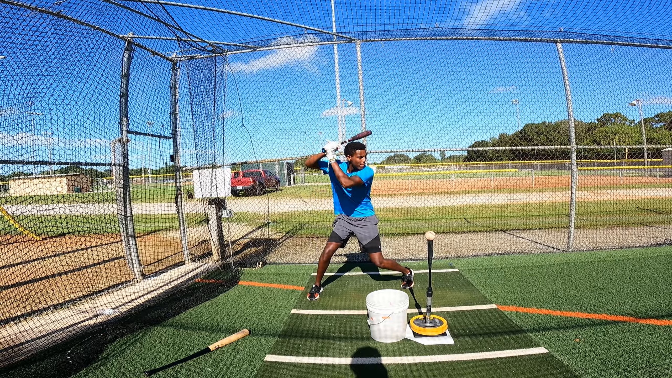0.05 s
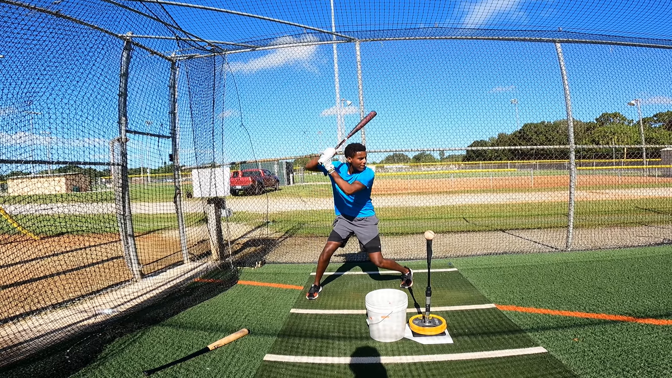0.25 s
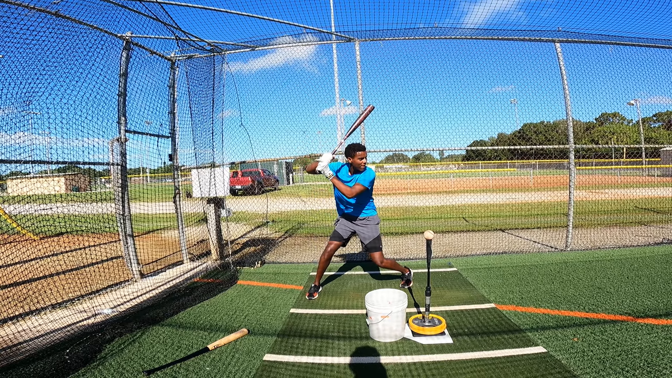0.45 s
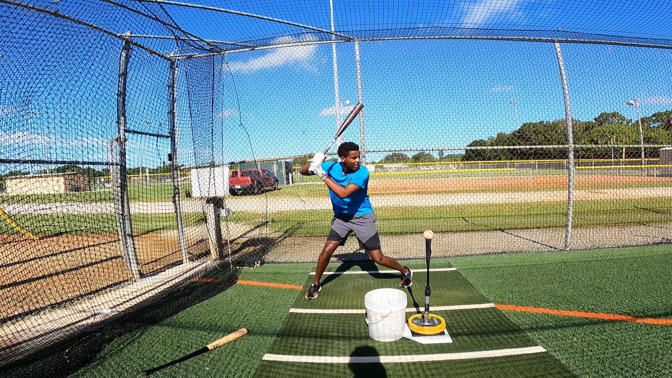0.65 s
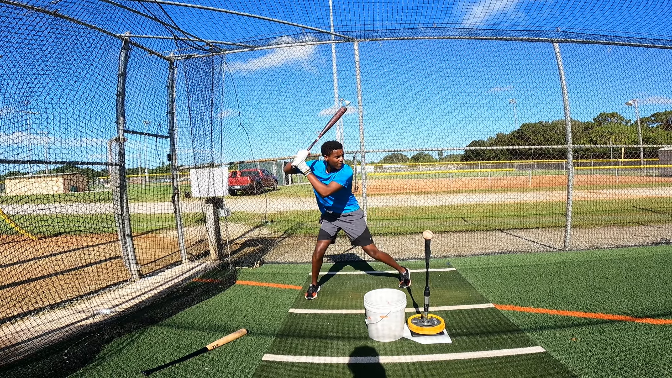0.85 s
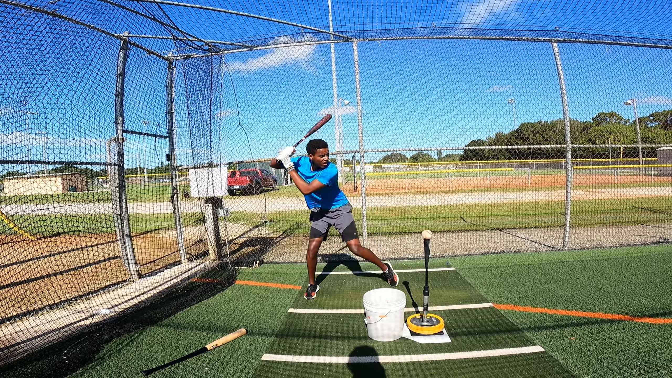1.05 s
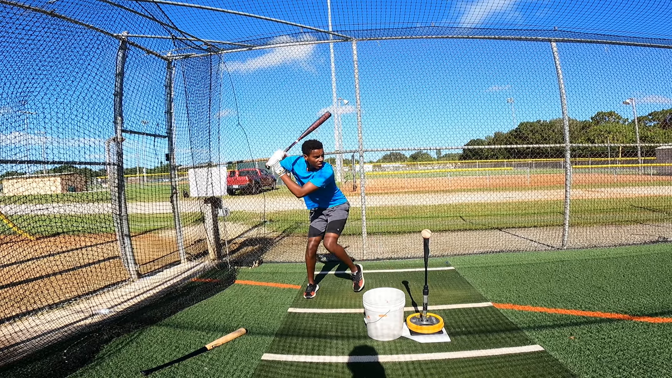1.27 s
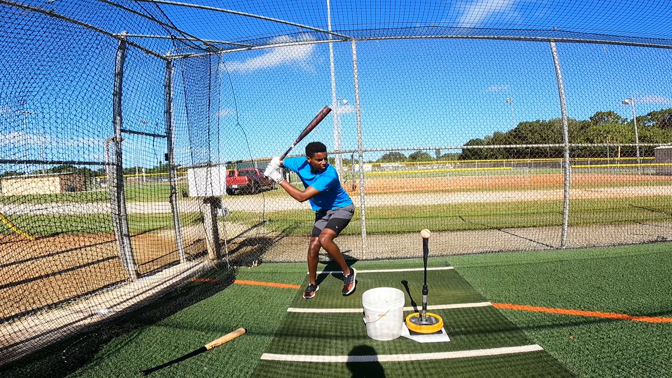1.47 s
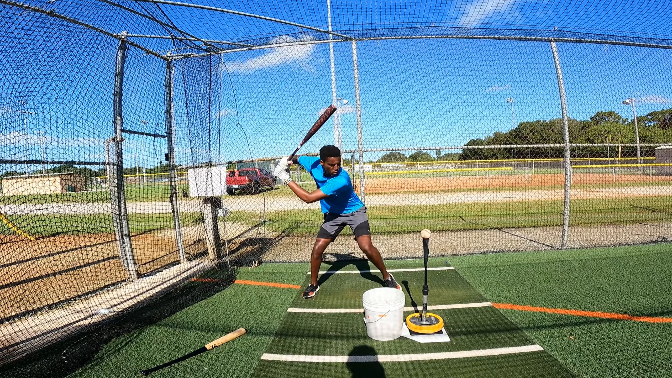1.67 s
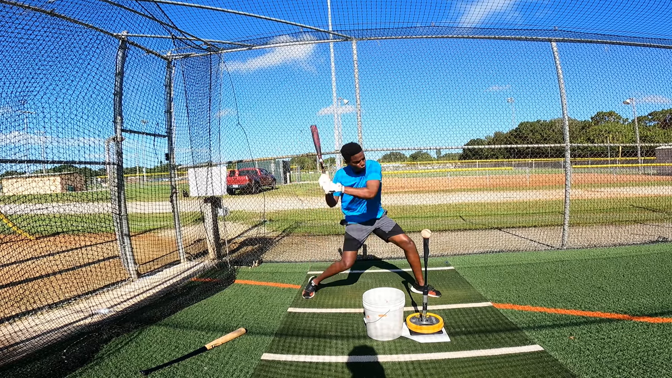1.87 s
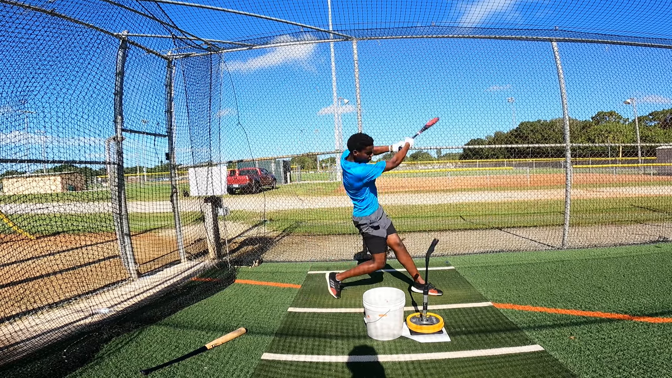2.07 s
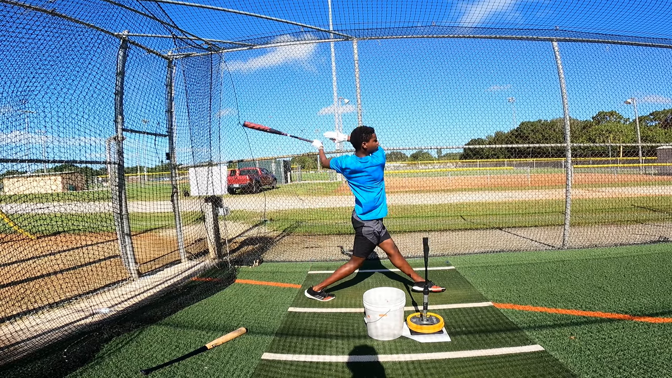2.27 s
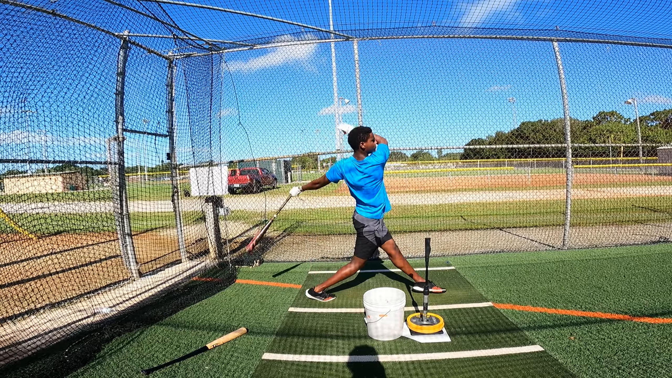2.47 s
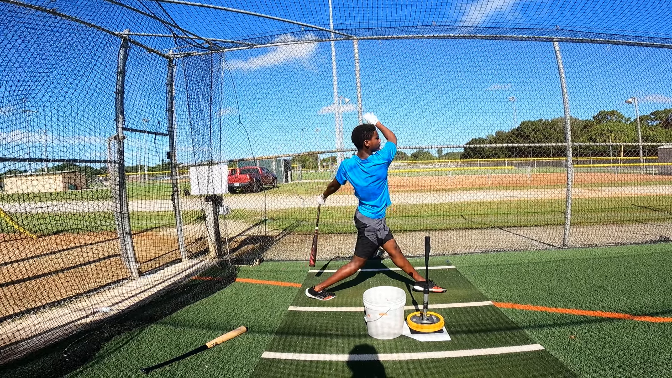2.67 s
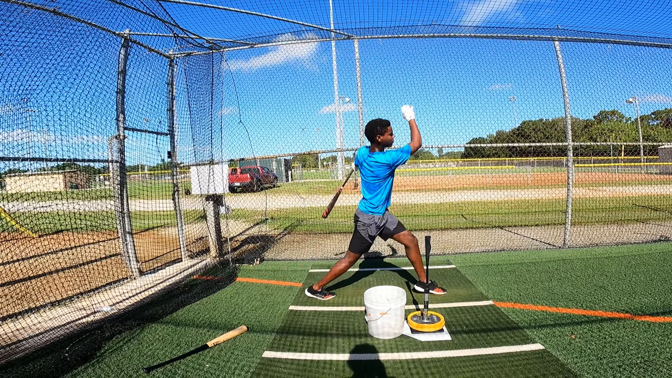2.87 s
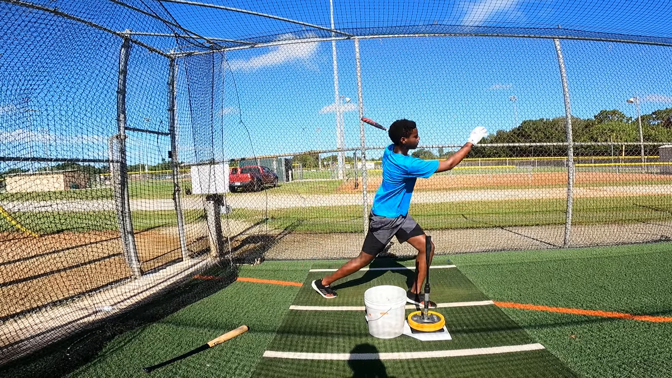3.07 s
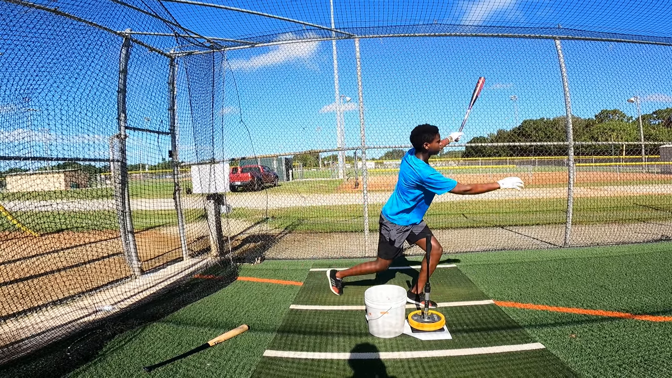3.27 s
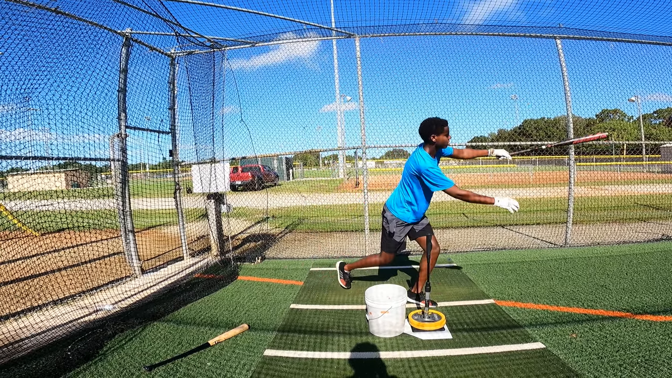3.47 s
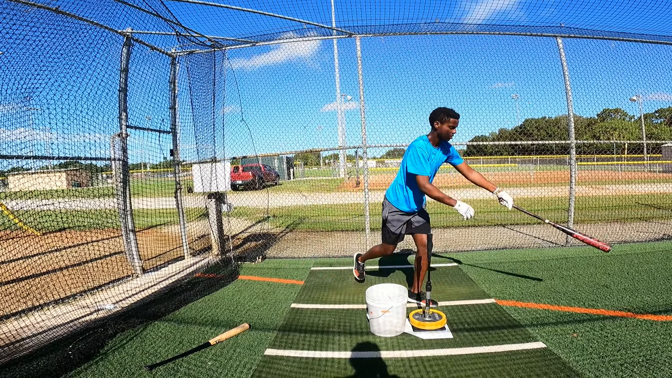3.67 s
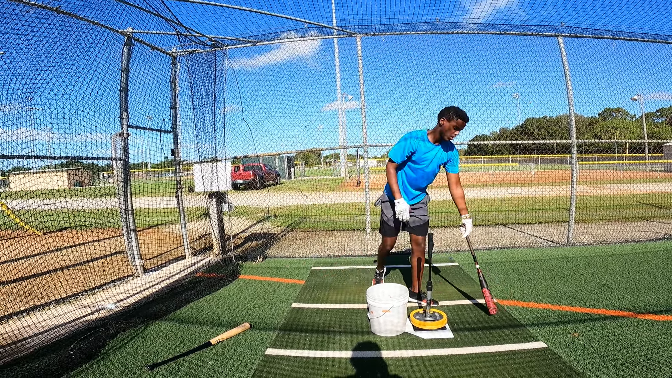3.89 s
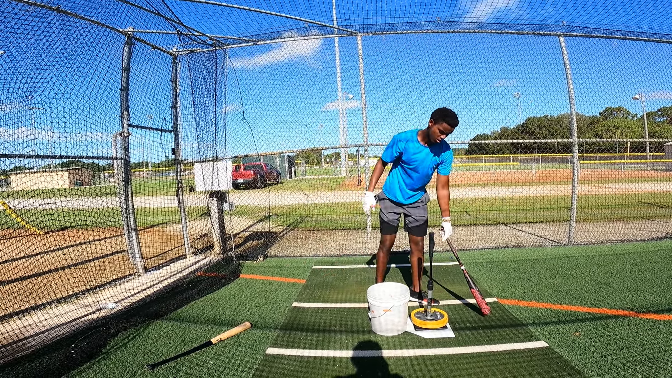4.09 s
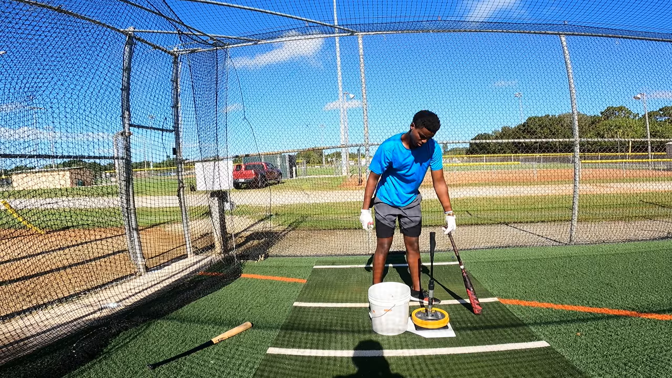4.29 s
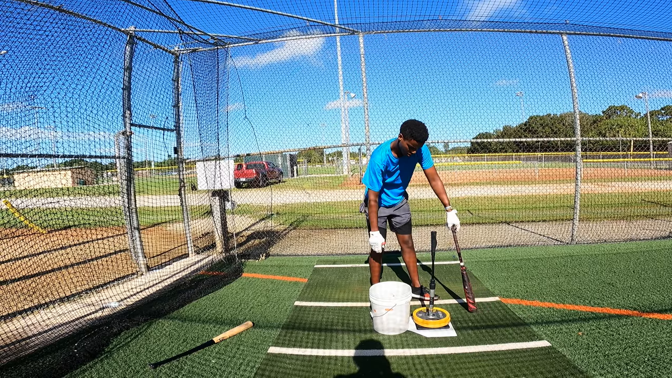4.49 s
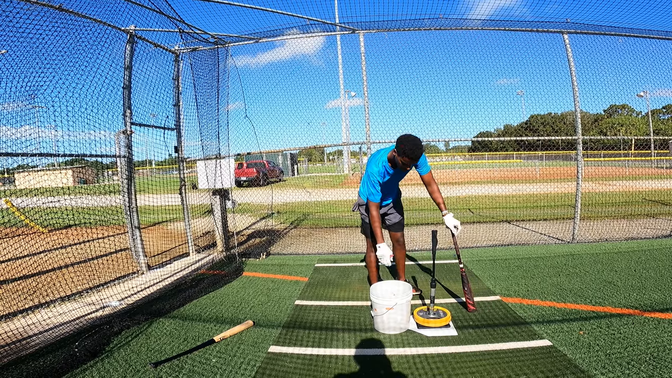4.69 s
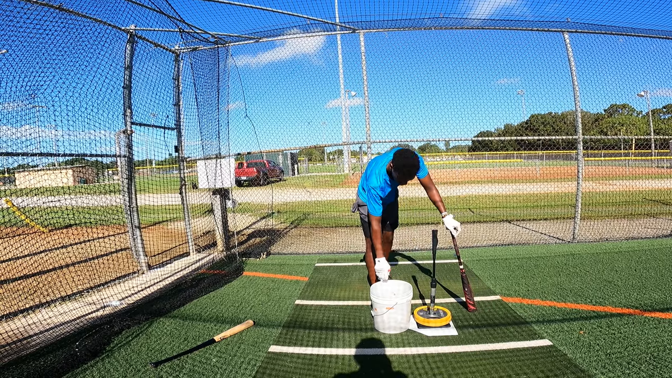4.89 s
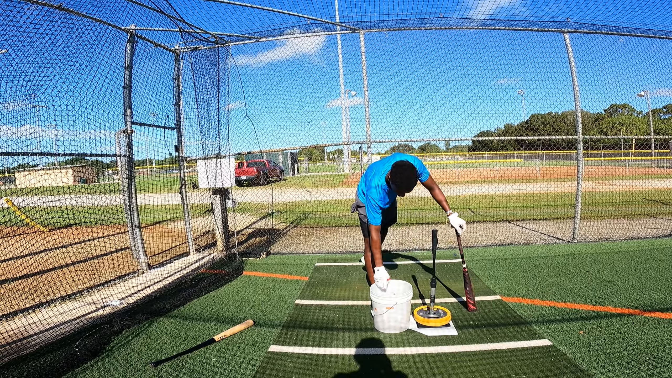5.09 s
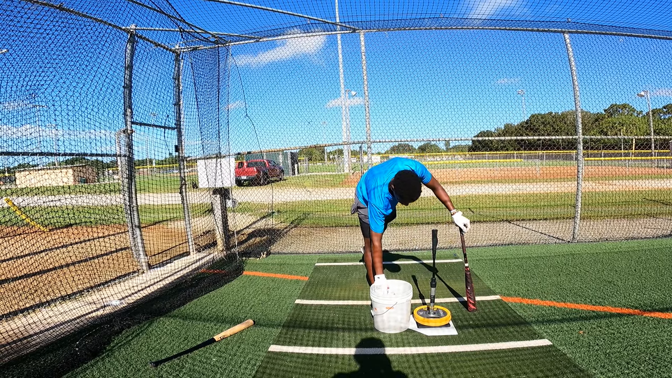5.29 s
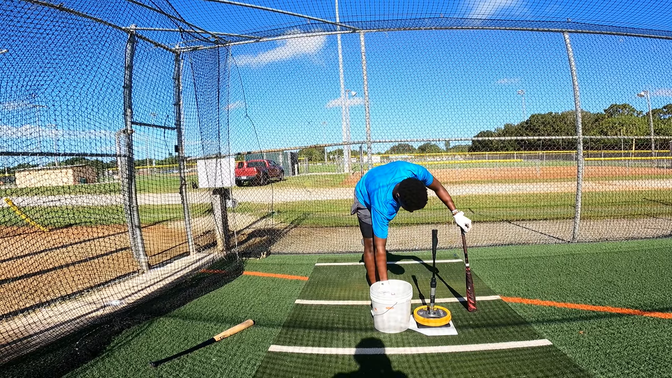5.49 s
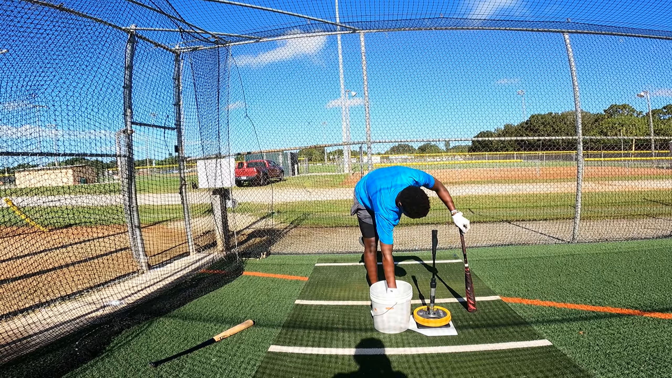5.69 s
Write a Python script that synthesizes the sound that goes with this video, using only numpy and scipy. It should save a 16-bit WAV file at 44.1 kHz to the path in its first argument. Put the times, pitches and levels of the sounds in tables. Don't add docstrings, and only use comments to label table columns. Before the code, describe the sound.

Outdoors in a batting cage, a distant mower hums low with cicadas and soft traffic rumble. Shoes scuff, then a bat hits a ball with one very loud, dry, metallic crack just after two seconds. The tee rattles, net and cage wires tick, a strap snaps, a heel knocks and the bat tip taps the mat. Stereo microphone a few metres away.

```python
import sys
import numpy as np
from scipy import signal
from scipy.fft import rfft, irfft, next_fast_len
from scipy.io import wavfile
from scipy.ndimage import uniform_filter1d, map_coordinates

SR = 44100
rng = np.random.default_rng(int(sys.argv[2]) if len(sys.argv) > 2 else 0)


def log_audio(samples):
    frames = np.atleast_2d(samples).T
    limited = np.clip(frames, -1, 1)
    pcm = np.round(limited * 32767).astype(np.int16)
    wavfile.write(sys.argv[1], SR, pcm)


def volts(x):
    e = np.asarray(x, float) / 20
    return 10 ** e


N = 253134
T = np.arange(N) / SR

SHAFT_HZ = 23.49
ECHO_SHARE = 0.52
CHORUS_OCTAVE_DB = -9
NEAR_CLEARS = 0.6
DUCK_FALL_S = 0.0158
BLOW_S = 2.11533
WALL_LAG_SAMPLES = 2
PORT_TURN = 0.09
WIRE_RISE_S = 0.00085

# freq_hz, level_db_per_hz
RUMBLE = [(12, -51), (20, -2.5), (92, -3), (125, -7), (195, -13), (330, -22.5), (430, -42), (730, -120)]
TRAFFIC = [(120, -35), (200, 12), (300, -3), (500, 0), (800, -5.5), (1200, -47)]
TYRES = [(600, -18.5), (1000, 4), (1400, 1), (2000, -5), (3000, -11), (4500, -51)]
AIR = [(2000, -12.5), (4000, 9), (6500, -3.5), (7800, 1.5), (10500, -10), (11500, -13), (14000, -11),
       (15200, -41)]
# rumble_db, traffic_db, tyres_db, air_db
FIELD_DB = (-35, -54, -59, -63)
# freq_hz, correlation
ALIKE = [(25, .8), (60, .92), (180, .92), (550, .85), (1650, .55), (5000, .75), (9500, .85), (15000, .75)]
# centre_s, swell_db, #
# length_s, engine_share (rest is tyres)
PASSES = [(1.426, 8.5, 0.26, 1), (1.912, 6.5, 0.19, 0.53), (2.75, 2, 0.34, 0.6), (3.086, 11, 0.22, 0.23),
          (3.595, 0, 0.27, 0.43), (3.88, 5, 0.57, 0.65), (4.31, -2.5, 0.068, 0.3), (1.162, 2, 0.2, 0.06),
          (4.76, 12, 0.34, 0.44), (5.194, 4, 0.1, 0.5), (5.643, 7, 0.37, 0.55)]
# start_s, depth_db, return_s
DUCKS = [
    (2.13, -9, 0.3),
    (3.04, -3.5, 0.15),
]
# time_s, level_db, upper_order_clearness_db, echo_lag_ms
MOWER = [(0, -32, -14, 2.9), (.5, -35, -10.5, 1.4), (.8, -32.5, -5.5, 1.04), (1.05, -34, -1, 0.83),
         (1.3, -36, 0, 0.34), (1.6, -39, 1, 1.18), (1.95, -31.5, -2.5, 1.2), (2.3, -37.5, -9.5, 1.3),
         (2.7, -36.5, 0, 1.3), (2.9, -34, 0, 1.56), (3.5, -35, -10.5, 2.42), (3.75, -35.5, -6.5, 2.94),
         (3.9, -36.5, -4, 3.22), (4.25, -38.5, -4, 3.54), (4.6, -33, -10, 3.87), (4.85, -33, -6, 4.18),
         (5.3, -32, -10.5, 4.53), (5.74, -34.5, -5, 4)]
# order, level_db
FIRINGS = [(4, -1), (8, -7)]
# order, level_db
SIDE_ORDERS = [(11, -15.5), (12, -25.5), (14, -19), (15, -19.5), (16, -11), (20, -37), (24, -25.5),
               (28, -21.5), (32, -34.5), (36, -35), (40, -35.5)]
# centre_s, order, gain_db, length_s
EDDIES = [(1.143, 16, 3.5, 0.11), (1.402, 24, 11.5, .17), (1.41, 28, 11, 0.11), (1.42, 32, 18, 0.15),
          (1.398, 40, 11, 0.13), (1.75, 28, 2.5, .2), (1.8, 11, 8.5, 0.25), (2.85, 36, 8.5, .25),
          (2.902, 28, 0.5, 0.22), (3.87, 32, 20, .08), (3.852, 28, 6, 0.12), (4.303, 24, 1.5, 0.28),
          (4.6, 28, 13.5, 0.24), (5.05, 28, 2, .1), (5.597, 28, 6.5, 0.16), (4.7, 36, 20, 0.13),
          (4.9, 24, 13, 0.56), (5.3, 20, 19, 0.34)]
# time_s, click_pairs_hz, level_db, far_chorus_share, second_drum_late_us
CICADA = [(0, 143, -55.5, 0.6, 52), (.1, 147.6, -57, 0.6, 63), (.16, 155, -54.5, 0.3, 59),
          (.32, 152.6, -55, 0.37, 56), (.5, 154, -56, 0.24, 73), (.75, 152.6, -54, 0.37, 71),
          (1.4, 152, -58, 0.48, 40), (2.0, 151.3, -56, 0.54, 100), (3.0, 150.3, -58, 0.63, 34),
          (3.25, 143, -63, 1, 18), (3.5, 153.2, -58.5, 0.4, 15), (3.53, 153, -57, 0.36, 120),
          (3.8, 150, -59.5, 0.6, 88), (3.97, 152.2, -58.5, 0.7, 96), (4.4, 147, -57.5, 0.64, 64),
          (4.8, 142, -56.5, 0.73, 56), (5.74, 135, -59.5, 0.73, 33)]
# freq_hz, width_hz, level_db
BELLY = [(4450, 100, 0), (4650, 240, -4), (4885, 100, 4), (5100, 200, -10), (5510, 90, 0), (5880, 150, -11)]
# start_s, freq_hz, level_db,
# t60_s, pan_db
WIRES = [(2.41, 2670, -56, 0.58, -8), (2.008, 1050, -36, .04, 1), (2.011, 2150, -40, .04, 6),
         (2.101, 950, -24, .03, -3), (2.46, 986, -35.5, 0.053, -3), (2.47, 1500, -36, 0.047, 1),
         (2.518, 5000, -39, 0.14, 4), (2.519, 4150, -44.5, 0.087, 4), (2.527, 1150, -40.5, .05, 10),
         (2.592, 5000, -46, .07, 10), (2.591, 7340, -47, 0.064, 3), (2.622, 5200, -43, 0.071, 2),
         (3.43, 5130, -53, .15, 3), (4.065, 1790, -43, 0.052, -2), (4.451, 1820, -50.5, .13, -2),
         (4.455, 6550, -61, 0.14, -2), (4.71, 3300, -60, .06, -1), (4.71, 6200, -58, .06, -3),
         (4.71, 12000, -68, .06, -1)]
# peak_s, peak_db, centre_hz, t60_s, pan_db
SCUFFS = [(1.081, -49, 1510, 0.11, 4), (1.96, -39.5, 2480, 0.24, -1), (2.006, -29, 1550, 0.16, 1),
          (2.069, -36, 2200, 0.34, 1), (2.104, -31, 1800, 0.021, -16), (2.343, -40, 4000, 0.043, -1),
          (2.531, -36, 2200, 0.36, 9), (3.09, -57, 2200, 0.022, -1), (3.104, -58, 2200, 0.027, -1),
          (4.441, -42, 2200, 0.16, 1), (4.445, -53, 6000, .1, -2), (4.679, -48, 2980, 0.048, 1),
          (4.71, -52, 5000, 0.033, 2)]
# peak_s, peak_db, centre_hz, t60_s, pan_db
RUSTLES = [(0.861, -54.5, 1360, 0.36, 19), (1.62, -42.5, 2600, 0.058, 2), (1.94, -40.5, 7500, 0.07, -2),
           (2.019, -31, 5900, 0.11, -.6), (2.051, -42, 4500, 0.08, 2), (2.54, -39, 4770, 0.14, -2),
           (2.301, -43.5, 4500, 0.32, -5), (2.59, -50, 5970, 0.058, 1), (2.625, -42, 5450, 0.11, 3),
           (2.668, -40, 3200, 0.17, -8), (3.015, -42, 3000, 0.074, -4), (3.09, -61, 1800, .1, -1),
           (3.168, -35.5, 2290, 0.1, -4), (3.405, -51, 7000, 0.046, 1)]
# peak_s, peak_db, centre_hz, t60_s, pan_db
FLICKS = [(2.157, -48, 3460, 0.083, 7), (2.19, -52.5, 4500, 0.11, 0), (2.23, -41, 2060, 0.62, 5),
          (2.438, -50, 3500, 0.029, -12), (2.4524, -35, 2600, .072, -12.5), (2.459, -34, 2200, 0.17, -1),
          (2.518, -36, 4800, 0.12, 6), (2.6, -47.5, 2500, .4, 3), (3.158, -52, 6000, 0.058, -2),
          (3.2, -48.5, 2000, 0.39, 0)]
FRICTION = [(1, 0.081), (0.65, .09), (0.83, .028)]
# start_s, peak_db
KNOCK = [
    (3.2887, -24.5),
]
# start_s, scrape_db, ring_re_scrape_db
TAPS = [
    (4.058, -35.5, -5),
    (4.066, -40.5, 2.5),
    (4.455, -56, -10),
]
# freq_hz, level_db, t60_s
TIP = [(2600, -15, 0.2), (3300, -20, .1), (4060, -6, 0.093), (5510, -16, 0.23), (6500, -10.5, 0.17),
       (8500, -16, .06), (12000, -22, 0.13)]
# start_s, peak_db, thump_re_peak_db, t60_s
TEE = [(2.157, -40, 10, 0.068), (2.182, -37.5, 4, 0.033), (2.206, -30, -2.5, 0.068),
       (2.224, -52, -7, 0.031), (2.246, -33.5, 4, 0.057), (2.252, -35.5, 5, 0.064), (2.27, -36, 8.5, 0.098),
       (2.301, -37.5, 5, 0.076), (2.321, -33.5, -18, 0.06), (2.334, -37.5, 2, 0.086),
       (2.399, -44, -7, 0.043)]
# freq_hz, width_hz, level_db
RUBBER = [(720, 120, 0), (1000, 200, -3), (1270, 150, 0), (1770, 150, -5), (2150, 250, -11),
          (2700, 300, -16)]
# freq_hz, level_db, t60_s
BARREL = [(1215, -11, 0.006), (2130, -4, 0.003), (2670, -5, 0.0068), (3310, -6.5, 0.0062),
          (4110, -1.5, 0.0053), (5390, 1, 0.0029), (6500, -6.5, 0.0028), (8000, -19, 0.0029),
          (9100, -7, 0.0014), (11600, -19, 0.0016), (14100, -28, .002)]
# freq_hz, level_db_per_hz
CRACK = [(88, -41), (150, 6), (827, -2.5), (1640, -5), (4140, -10.5), (5660, -14.5), (8500, -30),
         (11500, -48), (15000, -68)]
# time_s, freq_hz, level_db
SING = [
    (2.122, 2500, -44),
    (2.127, 2500, -26),
    (2.133, 2470, -35),
    (2.138, 2520, -49),
    (2.145, 2500, -41),
    (2.163, 2430, -32.5),
    (2.177, 2420, -40),
    (2.19, 2500, -47),
    (2.198, 2500, -45),
]
# freq_hz, gain_db
MIC_TOP = [(12000, 0), (14000, -3), (15500, -9), (16450, -16), (16520, -90)]


def unit(x):
    return x / np.sqrt(np.mean(x ** 2) + 1e-20)


def along(points, hz):
    f, v = np.transpose(points)
    return np.interp(np.log(hz + 1), np.log(f + 1), v)


def curves(rows):
    s, *cols = np.transpose(rows)
    return [np.interp(T, s, c) for c in cols]


def wobble(rate_hz):
    return map_coordinates(rng.standard_normal(int(N * rate_hz / SR) + 4), [T * rate_hz])


def filtered(x, response):
    m = next_fast_len(x.shape[-1] + 8192)
    return irfft(rfft(x, m) * response(np.fft.rfftfreq(m, 1 / SR)), m)[..., :x.shape[-1]]


def resonances(modes):
    return lambda f: sum((-1) ** k * volts(db) * 1j * f * w / (c * c - f * f + 1j * f * w)
                         for k, (c, w, db) in enumerate(modes))


def rush(response):
    def mid_side(hz):
        turn = np.arccos(np.clip(along(ALIKE, hz), -1, 1)) / 2
        return response(hz) * [np.cos(turn), np.sin(turn)]

    mid, side = filtered(rng.standard_normal((2, N)), mid_side)
    return unit(np.array([mid + side, mid - side]))


def add(out, s, sound, pan_db=0, lag=1):
    for ear, side in enumerate((1, -1)):
        start = round(s * SR) + lag * int(side * pan_db < 0)
        out[ear, start:start + len(sound)] += sound * volts(side * pan_db / 2)


def strike(t, rise_s, t60_s):
    return (1 - np.exp(-t / rise_s)) ** 2 * volts(-60 * t / t60_s)


def bump(centre_s, length_s):
    return np.exp(-((T - centre_s) / length_s) ** 2)


def blank(length_s):
    return np.zeros((2, N)), np.arange(int(SR * length_s)) / SR


def sine(hz, t):
    return np.sin(2 * np.pi * hz * t)


def duck():
    return sum(db * strike(np.maximum(T - s, 0), DUCK_FALL_S, 7 * back_s) for s, db, back_s in DUCKS)


def field():
    clear_db = curves(MOWER)[1]
    engines_db, tyres_db = sum(db * bump(s, length_s) * [[share], [1 - share]]
                               for s, db, length_s, share in PASSES)
    swells_db = (0.66 * duck() - 0.48 * T,
                 0.13 * clear_db + engines_db + 0.32 * duck(),
                 0.23 * clear_db + tyres_db + 0.17 * duck(),
                 0.072 * tyres_db + 0.64 * duck())
    puff_depths = (0.049, 0.42, 0.16, 0.062)
    out = 0
    for db, swell_db, depth, spectrum in zip(FIELD_DB, swells_db, puff_depths, (RUMBLE, TRAFFIC, TYRES, AIR)):
        puff = 1 + depth * np.cos(2 * np.pi * 4 * SHAFT_HZ * T)
        noise = rush(lambda hz: volts(along(spectrum, hz)))
        out = out + volts(db + swell_db + 2.44 * wobble(7)) * puff * noise
    return out


def mower():
    level_db, clear_db, echo_ms = curves(MOWER)
    turn = 2 * np.pi * np.cumsum(SHAFT_HZ * (1 + 0.002047 * wobble(3.01))) / SR

    def line(order):
        delayed = ECHO_SHARE * np.exp(-2j * np.pi * order * SHAFT_HZ * echo_ms / 1000)
        echo = np.abs(1 + delayed) / (1 + ECHO_SHARE)
        return np.sqrt(2) * volts(0.97 * wobble(8)) * echo * np.sin(order * turn + rng.uniform(0, 2 * np.pi))

    def focus_db(order):
        return sum(db * bump(s, length_s) for s, k, db, length_s in EDDIES if round(k) == round(order))

    low = volts(level_db) * sum(volts(db) * line(round(order)) for order, db in FIRINGS)
    high = sum(volts(db + focus_db(order)) * line(round(order)) for order, db in SIDE_ORDERS)
    high = volts(level_db.mean() + clear_db) * high
    pan_db = 0.77 + 0.3 * wobble(2.5)
    return (low + high) * volts([pan_db / 2, -pan_db / 2])


def cicadas():
    rate_hz, song_db, far, late_us = curves(CICADA)
    octave_db = song_db + CHORUS_OCTAVE_DB + 2.0 * duck() + 0.81 * wobble(2.4)
    song_db = song_db + 0.5 * duck()
    count = np.cumsum(2 * rate_hz * (1 + 0.00085 * wobble(6))) / SR
    when = np.interp(np.arange(1, int(count[-1])), count, np.arange(N))
    second_drum = np.arange(len(when)) % 2
    late = late_us[when.astype(int)] * SR / 1e6 * second_drum
    when = when + rng.normal(0, 0.15, len(when)) + late
    size = volts(rng.normal(0, 0.34, len(when))) * (1 + 0.18 * (-1) ** np.arange(len(when)))
    whole = when.astype(int)
    offsets = np.arange(-8, 9)
    kernel = np.sinc(offsets - (when - whole)[:, None]) * np.hanning(len(offsets) + 2)[1:-1]
    places = np.clip(whole[:, None] + offsets, 0, N - 1)
    clicks = np.bincount(places.ravel(), (size[:, None] * kernel).ravel(), N)
    far = np.clip(far, 0, 1)
    turned = T > 3.1
    main = (song_db, far * (NEAR_CLEARS + (1 - NEAR_CLEARS) * far), (4750, 1200, 0))
    octave = (octave_db, np.sqrt(far), (9350, 1500, 0))
    out = 0
    for db, blur, body in (main, octave):
        ring = lambda hz: resonances([body])(hz) ** 3
        near = unit(filtered(clicks, ring))
        if body[0] < BELLY[-1][0]:
            belly = filtered(clicks, lambda hz: resonances(BELLY)(hz) * resonances([body])(hz))
            near = np.where(turned, near, unit(belly))
        out = out + volts(db) * (np.sqrt(1 - blur) * near + np.sqrt(blur) * rush(ring))
    return out


def wires():
    out, t = blank(1 / 5)
    for s, hz, db, t60_s, pan_db in WIRES:
        shake = volts(5 * unit(uniform_filter1d(rng.standard_normal(len(t)), 90)))
        add(out, s, volts(db) * shake * sine(hz, t) * strike(t, WIRE_RISE_S, t60_s), pan_db)
    return out


def scuffs():
    out, t = blank(1 / 3)
    for rows, (octaves, rise_share) in zip((SCUFFS, RUSTLES, FLICKS), FRICTION):
        for s, db, hz, t60_s, pan_db in rows:
            grain_db = 2 * unit(uniform_filter1d(rng.standard_normal(len(t)), 70))
            grit = rng.standard_normal(len(t)) * volts(grain_db)
            colour = lambda f: np.exp(-(np.log2((f + 1) / hz) / octaves) ** 2 / 2)
            rise_s = rise_share * t60_s
            add(out, s - rise_s, volts(db) * unit(filtered(grit, colour)) * strike(t, rise_s, t60_s), pan_db)
    return out


def taps():
    out, t = blank(1 / 4)
    for s, db in KNOCK:
        push = np.exp(-((t - 0.002) / 0.00021) ** 2)
        knock = filtered(push, resonances([(336, 230, 4), (950, 1100, -13), (2200, 560, -2.5)]))
        add(out, s - 0.001, -volts(db + 9.5) * knock, pan_db=-1.5)
    snap = rng.standard_normal(len(t)) * strike(t, 0.0001, 0.0057)
    snap = filtered(snap, resonances([(1700, 1500, 0), (4500, 1000, 7), (9000, 9900, -16)]))
    add(out, 3.0066, volts(-25.5) * snap / np.abs(snap).max(), pan_db=-2)

    def chatter_db():
        return 3.5 * unit(uniform_filter1d(rng.standard_normal(len(t)), 200))

    for s, db, ring_db in TAPS:
        ring = sum(volts(level_db + chatter_db() - 60 * t / min(t60_s, 0.25)) * sine(hz, t)
                   for hz, level_db, t60_s in TIP)
        scrape = filtered(rng.standard_normal(len(t)), resonances([(2000, 2800, -2), (4200, 3100, 0)]))
        scrape = unit(scrape) * strike(t, 0.0047, 0.093)
        add(out, s, volts(db) * (scrape + volts(ring_db) * ring), pan_db=-3.5)
    return out


def tee():
    out, t = blank(1 / 8)
    for s, db, thump_db, t60_s in TEE:
        shake = rng.standard_normal(len(t)) * strike(t, 0.00021, t60_s)
        shake[4] += 15
        rattle = uniform_filter1d(filtered(shake, resonances(RUBBER)), size=3)
        rattle = volts(db + 2.5) * rattle / np.abs(rattle).max()
        thump = volts(db + thump_db + 9.5) * sine(250, t) * strike(t, 0.0024, 0.053)
        add(out, s, rattle + thump, pan_db=0.0)
    return out


def bat():
    out, t = blank(1 / 10)
    wall = 0
    for hz, db, t60_s in BARREL:
        mode = -volts(db - 60 * t / t60_s) * sine(hz, t)
        lag = round(PORT_TURN * SR / hz)
        add(out, BLOW_S, mode, pan_db=-2.5, lag=lag)
        add(out, BLOW_S + 0.00082, volts(-3) * uniform_filter1d(mode, 4), pan_db=-2.5, lag=lag)
        wall = wall + mode
    add(out, BLOW_S + 0.0024, volts(-19) * uniform_filter1d(wall, size=4), pan_db=-3, lag=WALL_LAG_SAMPLES)

    click = filtered(rng.standard_normal(len(t)), lambda hz: resonances([(8000, 6000, 0)])(hz) ** 2)
    add(out, BLOW_S, volts(-18) * unit(click) * strike(t, 0.0001, 0.003), pan_db=-6)
    ball = ((630, -9.5, 0.0084), (446, -17.5, 0.0245))  # freq_hz, level_db, t60_s
    squash = sum(volts(db - 60 * t / t60_s) * sine(hz, t) for hz, db, t60_s in ball)
    add(out, BLOW_S, squash, pan_db=-1.5)
    spray = unit(filtered(rng.standard_normal(len(t)), lambda hz: volts(along(CRACK, hz))))
    spray_level = volts(-13) * strike(t, 0.00034, 0.024) + volts(-32) * strike(t, 0.004, 0.14)
    add(out, BLOW_S, spray * spray_level, pan_db=-3)

    hz, db = curves(SING)
    sings = (T > SING[0][0]) & (T < SING[-1][0])
    phase = 2 * np.pi * np.cumsum(hz) / SR + [[-0.3], [0.3]]
    out += np.sqrt(2) * uniform_filter1d(sings * volts(db), 150) * np.sin(phase) * volts([[-2], [1.5]])
    out += volts(-17.5) * bump(2.089, 0.01) * np.cos(2 * np.pi * 85 * (T - 2.095))

    since = T - BLOW_S
    before = np.minimum(since, 0)
    after = np.maximum(since, 0)
    swell = np.where(since < 0, volts(-15 + 60 * before / 0.036), volts(-10 - 60 * after / 0.02))
    tone = np.cos(2 * np.pi * 910 * (since - np.array([[0.00073], [0.00062]])))
    out += uniform_filter1d(swell, 30) * tone * volts([[-1], [1]])
    out += (since < 0) * volts(-40.0 + 60 * before / 0.05) * np.cos(2 * np.pi * 8000 * since)
    add(out, BLOW_S, volts(-9) * sine(75, t) * strike(t, 0.001, 0.04), pan_db=-6)
    return out


def scene():
    return field() + mower() + cicadas() + wires() + scuffs() + taps() + tee() + bat()


def roll_off(x):
    return signal.sosfilt(signal.butter(12, 16490, fs=SR, output="sos"), x)


def record(dry):
    ceiling = 1.05
    soft = dry / (1 + np.abs(dry / ceiling) ** 6) ** (1 / 6)
    mix = filtered(soft, lambda hz: volts(along(MIC_TOP, hz)))
    return roll_off(mix)


dry = scene()
out = record(dry)
log_audio(out)
```